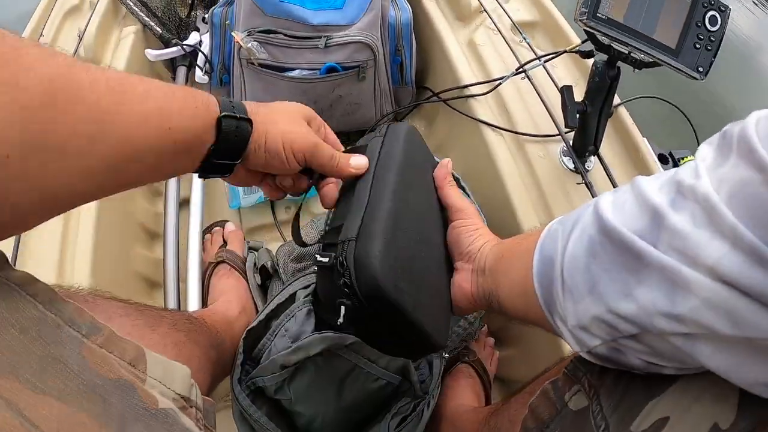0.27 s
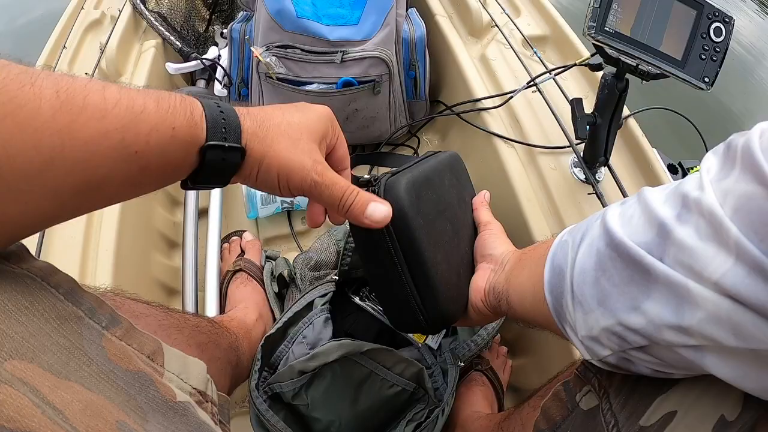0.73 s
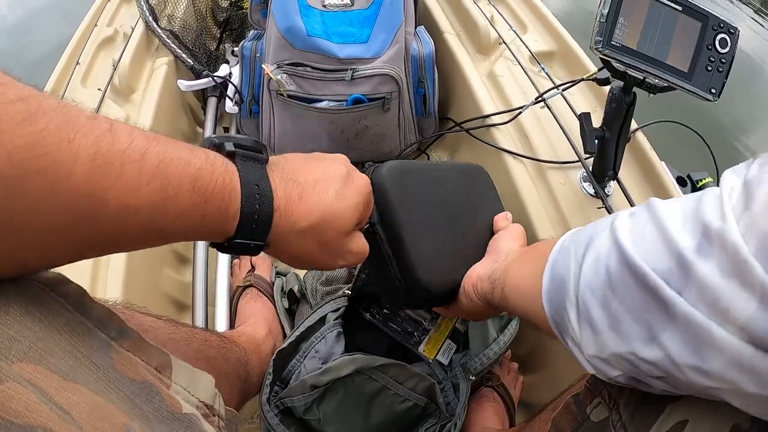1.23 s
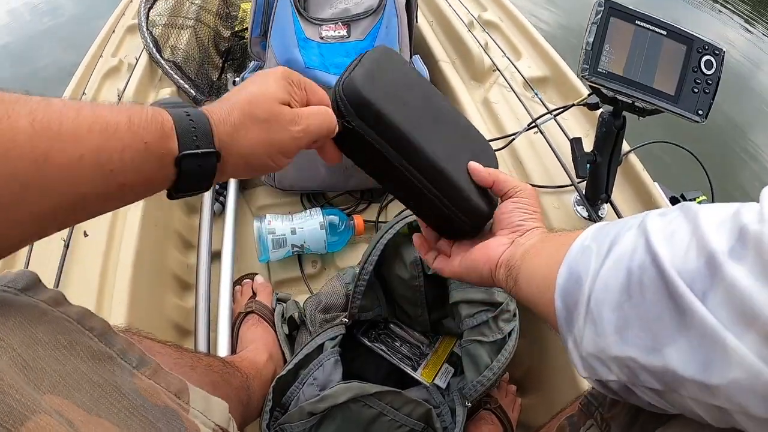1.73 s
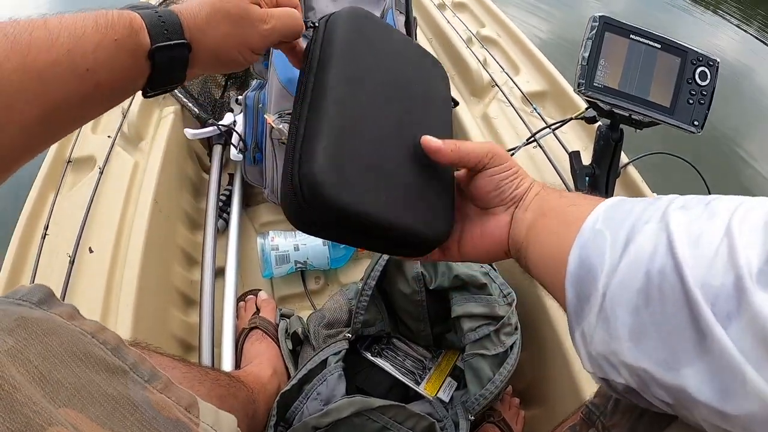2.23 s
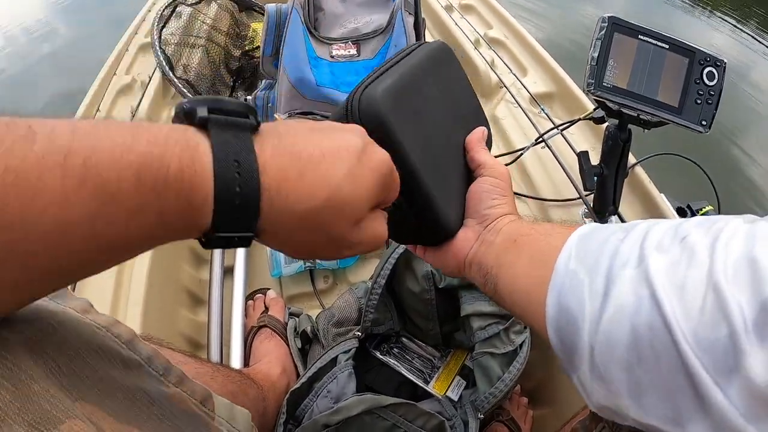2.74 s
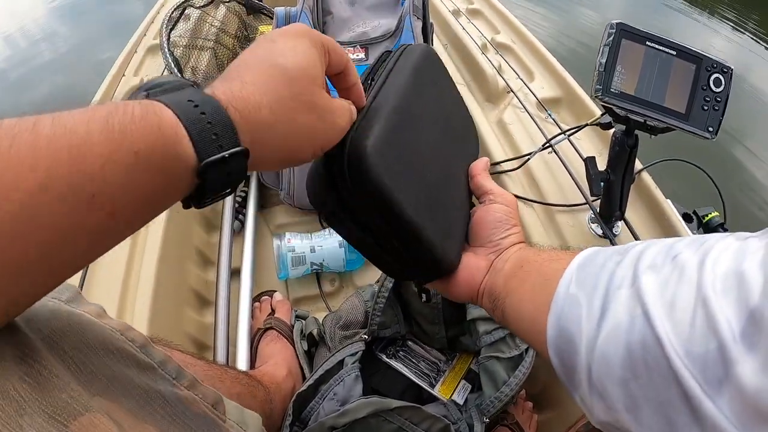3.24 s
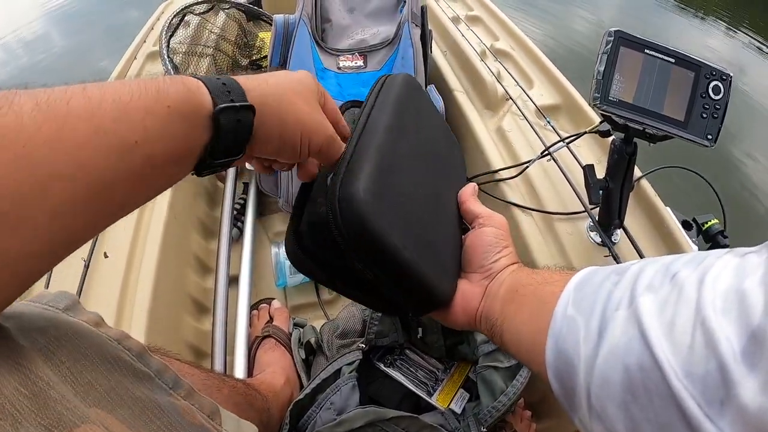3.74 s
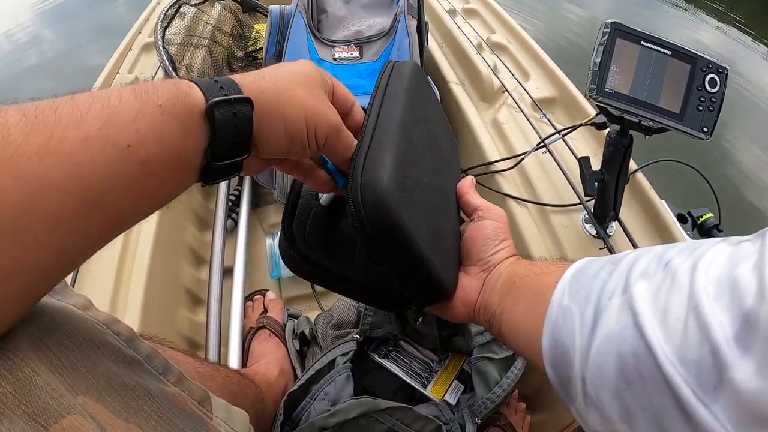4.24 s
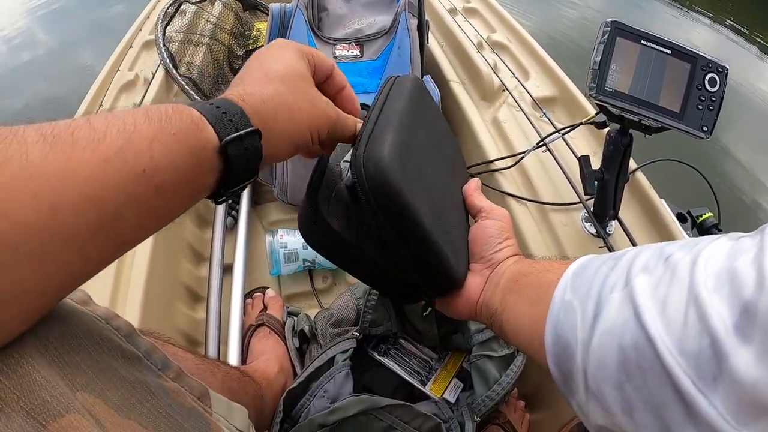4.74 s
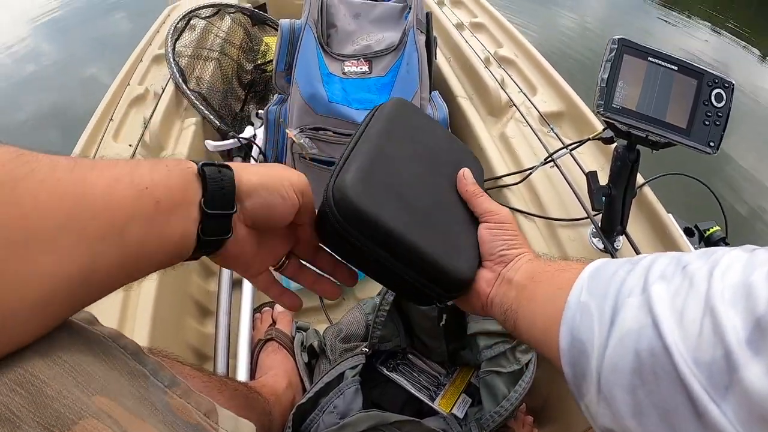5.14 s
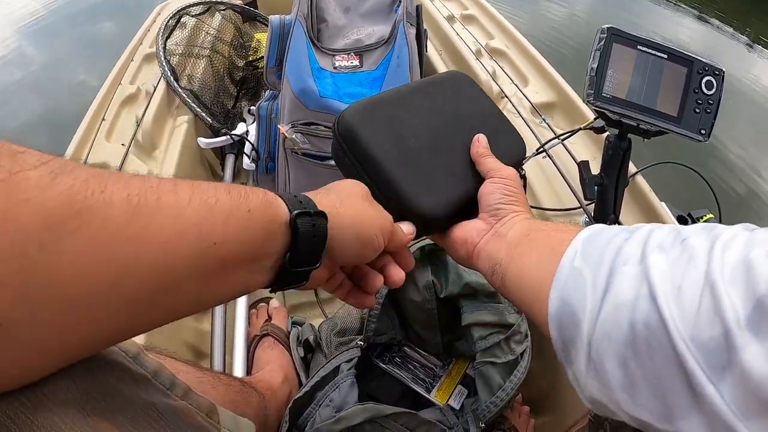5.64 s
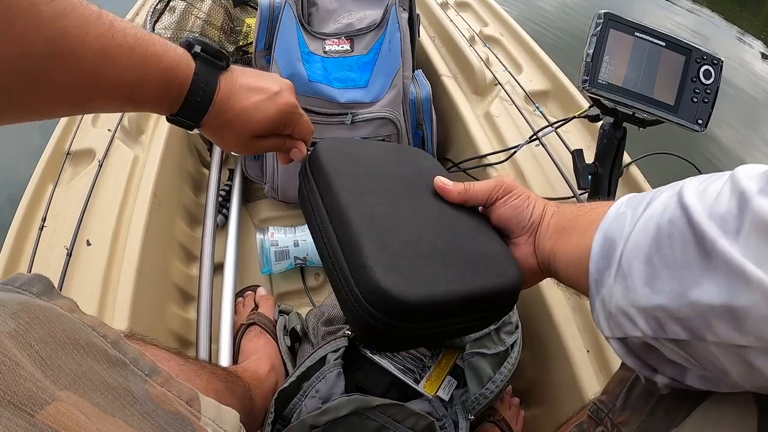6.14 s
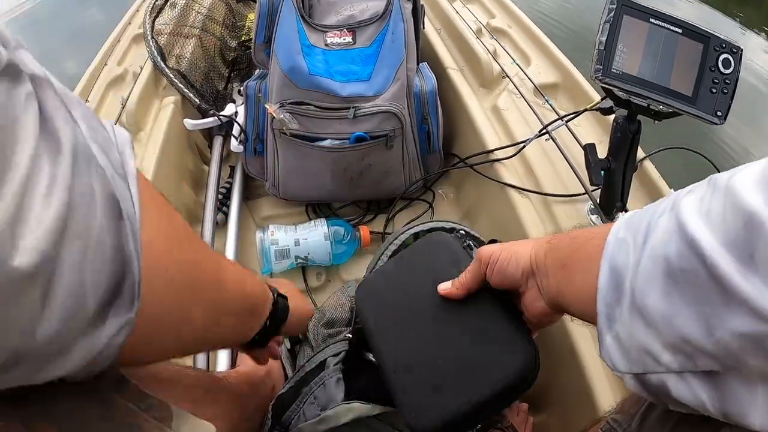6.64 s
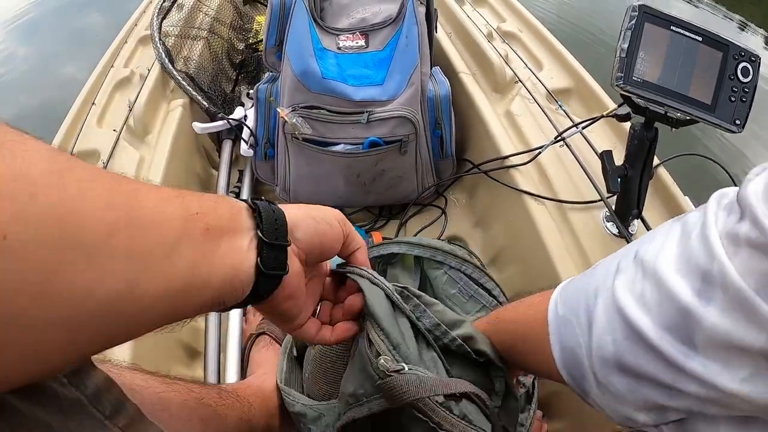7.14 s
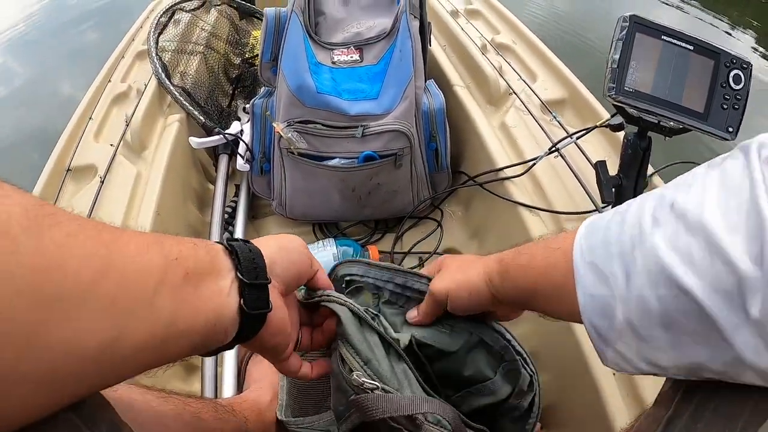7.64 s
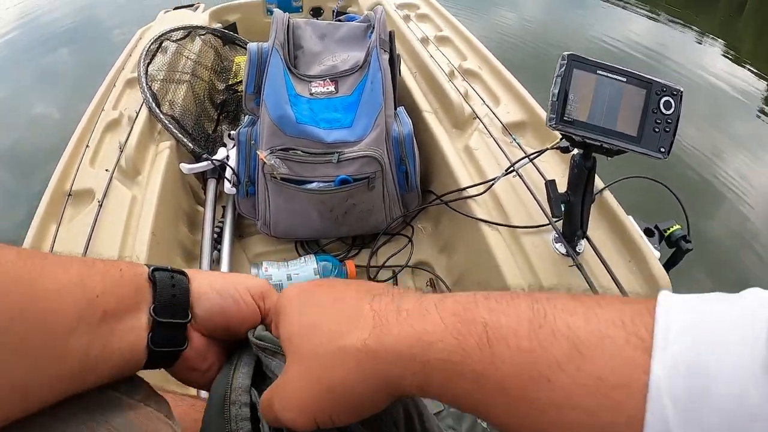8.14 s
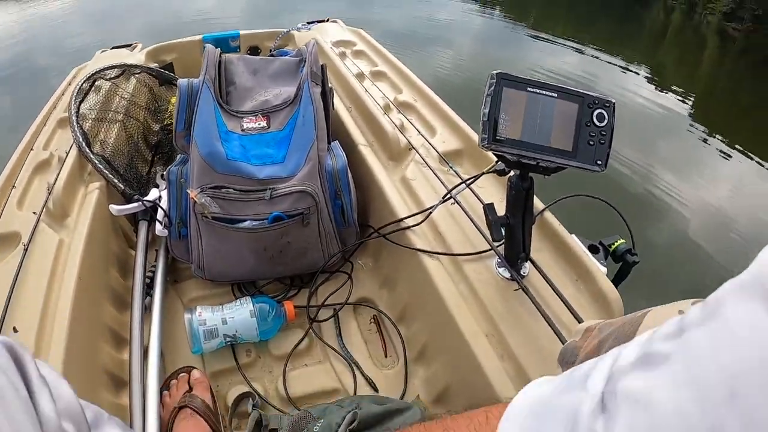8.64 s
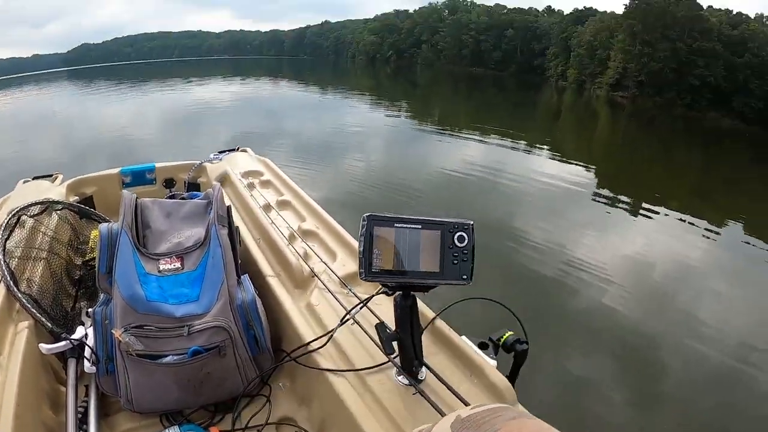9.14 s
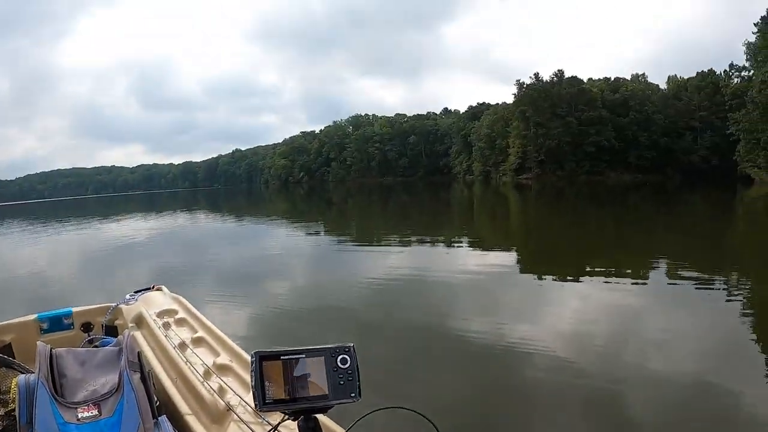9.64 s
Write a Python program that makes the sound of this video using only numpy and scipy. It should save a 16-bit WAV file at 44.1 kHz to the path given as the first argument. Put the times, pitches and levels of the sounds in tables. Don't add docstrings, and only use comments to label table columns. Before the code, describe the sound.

Outdoors on a small boat, close and dry, over a soft low rumble, very faint insects and a distant low propeller drone that fades by 2.5 s. From 0 to 0.6 s cloth rustles and a hollow case knocks lightly. A quick zipper tug rasps at 1.2-1.5 s; boxy knocks follow, then two joined pulls at 2.4-2.9 s, rising in pitch and ending in knocks. From 3 to 5.5 s, fumbling gives hollow knocks, bouncing metal tab ticks and a strong knock at 4.7 s. From 5.7 to 6.5 s the zipper closes in uneven bursts, fastest near 6.1 s, creeping, then running to a stop. Cloth scuffs swell from 6.7 s, with hard knocks at 7.1 and 7.3 s, and heavy hull bumps at 8.1 and 8.3-8.4 s. Rustle dies away; faint drones return and water laps softly at 9.2 s.

```python
import sys
import numpy as np
from scipy import signal
from scipy.fft import rfft, irfft, next_fast_len
from scipy.io import wavfile
from scipy.ndimage import uniform_filter1d

SR = 44100
rng = np.random.default_rng(int(sys.argv[2]) if len(sys.argv) > 2 else 0)


def put_to_file(sound):
    columns = np.atleast_2d(sound).T
    safe = np.clip(columns, -1, 1)
    whole_steps = np.round(safe * 32767)
    wavfile.write(sys.argv[1], SR, whole_steps.astype(np.int16))


def linear_from_db(decibels):
    return 10 ** (np.asarray(decibels, float) / 20)


N = 436149
TIME = np.arange(N) / SR


def rms_one(x):
    return x / np.sqrt(np.mean(x ** 2) + 1e-20)


def in_time(rows):
    s, *columns = np.transpose(rows)
    return [np.interp(TIME, s, column) for column in columns]


def at_hz(points, hz):
    f, value = np.transpose(points)
    return np.interp(np.log(hz + 1), np.log(f + 1), value)


def drift(rate):
    r = np.exp(-80 * np.pi * rate / SR)
    noise = rng.standard_normal(N // 40 + 2002)
    slow = signal.lfilter([1], [1, -2 * r, r * r], noise)[2000:]
    return np.interp(np.arange(N) / 40, np.arange(len(slow)), rms_one(slow))


def resonate(x, modes):
    out = 0
    for k, (hz, width, db) in enumerate(modes):
        r = np.exp(-np.pi * width / SR)
        poles = [1, -2 * r * np.cos(2 * np.pi * hz / SR), r * r]
        ring = signal.lfilter([(1 - r * r) / 2, 0, (r * r - 1) / 2], poles, x + 1e-18)
        out = out + (-1) ** k * linear_from_db(db) * ring
    return out


def twice(x, hz, width):
    band = [(hz, width, 0)]
    return resonate(resonate(x, band), band)


def filtered(x, order, hz, kind):
    return signal.sosfilt(signal.butter(order, hz, kind, fs=SR, output="sos"), x)


def banded(source, spectrum, patchy_db, flicker):
    out, together = 0, drift(flicker / 2)
    edges = 20 * 2 ** np.arange(0, 9.7, .46)
    for k, (low, high) in enumerate(zip(edges, edges[1:])):
        level_db = at_hz(spectrum, np.sqrt(low * high))
        if level_db > -60:
            band = filtered(source[k % 2], 2, [low, high], "band")
            patchy = patchy_db * (0.29 * together + drift(flicker))
            out = out + linear_from_db(level_db + patchy) * band
    return rms_one(out)


def add(track, s, sound):
    i = round(s * SR)
    track[i:i + len(sound)] += sound[:N - i]


def evened(x):
    return x / np.sqrt(uniform_filter1d(x ** 2, size=1800) + 1e-12)


# [t/s, level/dB]
RUMBLE_LEVEL = [(0, -33.5), (.45, -40), (1.4, -37), (2.1, -39.5), (3.2, -36.5), (5.75, -34.5), (6.5, -36.5),
                (8.45, -32.5), (9.89, -33)]
# [f/Hz, level/dB per Hz]
AIR_COLOUR = [(12, -35), (20, -7), (85, 2.5), (174, -3.5), (211, -5.5), (304, -9.5), (332, -18), (459, -8),
              (534, -22), (978, -18), (1440, -28.5), (3500, -60.5), (4550, -79), (7700, -120)]


def open_air():
    noise = rng.standard_normal((2, N))
    level_db = in_time(RUMBLE_LEVEL)[0] + .6
    return linear_from_db(level_db) * banded(noise, AIR_COLOUR, patchy_db=.3, flicker=8)


# [t/s, insects level/dB, road level/dB]
SHORE = [(0, -87.5, -60), (2.2, -100, -63.5), (2.9, -78, -54), (5.5, -76, -45.5), (6.6, -76.5, -53),
         (9.89, -85.5, -62.5)]


def shore():
    out = 0
    for db, (hz, width) in zip(in_time(SHORE), ((6910, 1700), (752.4, 441))):
        band = rms_one(twice(rng.standard_normal(N), hz, width))
        out = out + linear_from_db(db - 1.0 + 4.14 * drift(8.4)) * band
    return out


# [t/s, f/Hz, level/dB]
PROPELLERS = [
    [(0, 148.3, -39), (.65, 148.2, -42), (2.3, 142.2, -40.5), (2.48, 144.9, -40), (2.55, 141, -72.5)],
    [(8.6, 260, -58.5), (8.7, 264.6, -41.5), (9.42, 264, -44.5), (9.6, 275.8, -54.5)],
    [(9.4, 215.2, -64.5), (9.55, 210.7, -40), (9.89, 211.2, -43)],
]


def drones():
    out = 0
    for rows in PROPELLERS:
        hz, db = in_time(rows)
        heard = (TIME >= rows[0][0]) & (TIME < rows[-1][0])
        level = linear_from_db(db + 3 + 1.5 * drift(4))
        out = out + heard * level * np.sin(2 * np.pi * np.cumsum(hz + .8 * drift(4)) / SR)
    return out


# [peak t/s, level/dB, time to swell by 10 dB/s]
HAND_STROKES = [(0.0, -48.5, 0.0831), (.1, -47, 0.0843), (.24, -51.5, 0.1137), (.37, -61, 0.1039),
                (.6, -62.5, 0.09), (1.5, -60, 0.39), (2.35, -64.5, 1.3), (3.7, -64, 0.54), (4.8, -56, 0.01),
                (5.55, -66, 0.3), (6.79, -52, 0.03), (6.892, -47, .05), (7.042, -43.5, 0.0268),
                (7.148, -37, 0.0815), (7.335, -38, 0.0483), (7.42, -58, 0.06), (7.641, -46.5, 0.0381),
                (7.769, -44.5, 0.143), (7.95, -46, 0.2), (8.05, -59, 0.02), (8.24, -55, 0.17),
                (8.38, -43, 0.07), (8.62, -48, 0.1624), (8.84, -54.5, 0.2872), (9.1, -67.5, 0.79)]
FADE_SHARE = 1.072
STILL_DB = -74
SQUARENESS = 1.143


def handling():
    t = np.arange(0, N, 40) / SR
    power = linear_from_db(2 * STILL_DB)
    for s, db, swell in HAND_STROKES:
        away = np.maximum(s - t, (t - s) / FADE_SHARE) / swell
        power = power + linear_from_db(2 * db - 20 * away ** SQUARENESS)
    return np.interp(TIME, t, 10 * np.log10(power))


# [f/Hz, level/dB per Hz]
CLOTH_COLOUR = [(1060, -87.5), (1800, -1.5), (2680, 2), (3630, 5.5), (7020, -7), (7820, -3.5), (9190, -9.5),
                (14200, -30.5), (15500, -46)]
# [f/Hz, level/dB per Hz]
DRAG_COLOUR = [(180, -27.5), (300, 3), (415, 2), (487, 2.5), (1140, -1.5), (2200, -20.5), (2860, -20),
               (4840, -120)]


def rustle():
    cloth_db = handling()
    drag_db = -36.5 + 1.024 * (cloth_db + 47.0)
    sizes = linear_from_db(3.2 * np.minimum(rng.exponential(1, (2, N)), 5)) * rng.choice([-1, 1], (2, N))
    draw, hiss = rng.random((2, N)), rng.standard_normal((2, N))
    fine = sizes * (draw < 2600 * linear_from_db(3.5 * drift(40)) / SR) + .25 * hiss
    coarse = sizes * (draw > 1 - 220 * linear_from_db(7 * drift(25)) / SR) + .12 * hiss
    cloth = linear_from_db(cloth_db) * banded(fine, CLOTH_COLOUR, patchy_db=2.2, flicker=15)
    drag = linear_from_db(drag_db) * banded(coarse, DRAG_COLOUR, patchy_db=2.5, flicker=42.4)
    return cloth + drag


# [t/s, peak level/dB, f/Hz]
KNOCKS_IN_BAG = [(0.009, -26, 528), (0.086, -28.5, 609), (0.176, -30, 446), (0.219, -32.5, 543),
                 (0.312, -29.5, 481), (6.659, -32.5, 493.5), (6.874, -32, 317), (7.127, -12, 695),
                 (7.3, -16, 651), (7.545, -36.5, 400), (7.586, -28, 358.6), (7.866, -31, 330.5),
                 (8.106, -19, 538), (8.315, -10.5, 367.6)]
# [t/s, peak level/dB, f/Hz]
SHELL_KNOCKS = [(1.629, -25.5, 430), (1.666, -20, 371.8), (1.797, -26.5, 422.7), (2.051, -17.5, 385),
                (2.308, -17, 357), (2.477, -22, 371.2), (2.564, -7, 399.8), (2.59, -8.5, 407.4),
                (2.845, -12.5, 397.4), (3.183, -23, 373.3), (3.359, -24.5, 435.7), (3.474, -11.5, 382.8),
                (3.684, -10, 526), (3.919, -6.5, 715.6), (3.922, -15.5, 416.7), (4.234, -23.5, 457.4),
                (4.418, -20.5, 417), (4.458, -26, 360.2), (4.728, -1.5, 489.3), (4.863, -12.5, 415),
                (5.122, -23, 485), (5.404, -21.5, 467), (6.029, -18, 478), (6.095, -12.5, 464.4),
                (6.174, -9.5, 355.2), (6.426, -18.5, 360.4), (6.486, -30, 424.5)]
RING_CYCLES = 23.56
HARD_SHORTENS = 0.276


def knocks(rows, crack_db, top_hz, rise_s):
    out, t = np.zeros(N), np.arange(6000) / SR
    crackle = filtered(rng.standard_normal((len(rows), len(t))), 2, [700, top_hz], "band")
    rise = (1 - np.exp(-t / rise_s)) ** 2
    for (s, db, hz), noise in zip(rows, crackle):
        t60 = RING_CYCLES / hz * linear_from_db(-HARD_SHORTENS * (db + 23))
        turn = 2 * np.pi * hz * t
        boom = np.sin(turn) + .5 * np.sin(1.23 * turn) + 0.1173 * np.sin(2.9 * turn)
        crack = linear_from_db(crack_db + 4 - 60 * t / 0.033) * noise
        add(out, s, linear_from_db(db) * rise * (linear_from_db(-60 * t / t60) * boom + crack))
    return out


# [t/s, peak level/dB, centre f/Hz, gap/s, number of touches]
TAB_RATTLES = [(3.6847, -34.5, 4170, 0.02015, 2), (3.7964, -33.5, 4270, 0.014, 3),
               (3.8742, -36, 5140, 0.015, 2), (3.9444, -35.5, 4790, 0.0187, 2),
               (3.9973, -40, 3360, 0.0186, 3), (4.137, -35, 5940, 0.0143, 4), (4.209, -41, 5290, .019, 2),
               (4.2473, -43, 4570, 0.0252, 2), (4.3036, -45, 4170, .021, 3),
               (4.3596, -45.5, 4960, 0.0272, 3), (4.644, -35.5, 3440, .0245, 3),
               (4.745, -51.5, 3630, 0.027, 5), (5.3973, -27.5, 2410, 0.01733, 2),
               (5.508, -32.5, 3090, 0.0137, 4)]
BOUNCE_LOSS_DB, BOUNCE_SCATTER_DB, BOUNCE_DETUNE = 1, 2, 0.084
BOUNCE_RING = 1.53


def bounces():
    out = []
    for s, db, hz, gap, touches in TAB_RATTLES:
        for k in range(min(round(touches), 8)):
            luck, detune = rng.standard_normal(2)
            touch_db = db - k * BOUNCE_LOSS_DB + BOUNCE_SCATTER_DB * luck
            out.append((s + k * gap, touch_db, hz * np.exp(BOUNCE_DETUNE * detune), BOUNCE_RING * gap))
    return out


# [t/s, peak level/dB, centre f/Hz]
LONE_TICKS = [(1.0643, -49, 3900), (1.148, -36.5, 3640), (1.489, -45, 3390), (1.6287, -38.5, 3740),
              (2.2152, -46.5, 3511), (2.297, -44, 2960), (2.388, -44.5, 2730), (2.4163, -38.5, 5916),
              (3.0636, -36, 2590), (3.617, -37.5, 2730), (3.6648, -23, 5180), (3.9131, -31, 3530),
              (3.924, -22, 3790), (4.4438, -37.5, 4500), (4.497, -43.5, 4000), (4.7156, -37, 4360),
              (4.727, -23.5, 3236), (4.8666, -35, 3000), (5.0774, -46.5, 3270), (5.125, -43, 3154),
              (5.4828, -38.5, 2905), (5.585, -35, 2759), (5.965, -33, 2676), (6.429, -29, 4030),
              (6.4576, -42.5, 3723), (7.5867, -52, 3092), (7.634, -42, 3880)]
# [f/Hz, width f/Hz, level/dB]
TAB_RING = [(6754, 170, -1.5), (8850, 2300, -12.5), (1250, 72.6, 4)]
TICK_T60_S = 0.0201


def ticks():
    out, t = np.zeros(N), np.arange(1800) / SR
    touches = [tuple(row) + (TICK_T60_S,) for row in LONE_TICKS] + bounces()
    noises = filtered(rng.standard_normal((len(touches), len(t))), 2, 8800, "low")
    for (s, db, hz, t60), noise in zip(touches, noises):
        rattle = noise * linear_from_db(-60 * t / t60) * (1 - np.exp(-t / 0.0006))
        own = resonate(rattle, [(hz, 650, 0), (2800, 3000, -6.5)])
        tick = own + resonate(rattle, TAB_RING)
        add(out, s, linear_from_db(db + 0.5) * tick / np.abs(tick).max())
    return out


# [t/s, teeth f/Hz, pull force level/dB]
OPENING_PULLS = [
    [(1.22, 250, -68), (1.29, 519.5, -48.5), (1.32, 455.6, -49.5), (1.367, 649.7, -39.5),
     (1.39, 532.7, -51), (1.42, 394.6, -51), (1.47, 187.8, -71)],
    [(2.41, 145, -49.5), (2.46, 170.1, -49), (2.5, 130.1, -50), (2.556, 385.4, -44), (2.6, 406.5, -37.5),
     (2.64, 360, -42), (2.67, 393.6, -46.5), (2.72, 151.1, -49)],
    [(2.725, 157, -49), (2.75, 323, -41.5), (2.78, 407.6, -42), (2.815, 478.6, -35), (2.85, 445, -50.5),
     (2.88, 227.5, -57.5)],
]
# [t/s, teeth f/Hz, pull force level/dB]
CLOSING_PULLS = [
    [(5.73, 229.7, -60), (5.785, 259.8, -51.5), (5.82, 369.2, -50), (5.862, 640.8, -33),
     (5.877, 481.4, -35.5), (5.91, 439.3, -43.5), (5.95, 270.1, -49.5), (5.99, 281, -44)],
    [(5.995, 279.3, -46), (6.015, 355.5, -46), (6.035, 511, -36), (6.055, 783.5, -34.5),
     (6.075, 1025, -32.5), (6.09, 758.7, -46.5), (6.103, 430.6, -41)],
    [(6.108, 431.5, -54), (6.125, 515.8, -38.5), (6.148, 540, -42.5), (6.17, 281.3, -48.5),
     (6.19, 90.03, -47.5)],
    [(6.195, 75.47, -51), (6.225, 77.8, -50.5), (6.25, 81.37, -53)],
    [(6.255, 100.6, -47), (6.275, 166, -37.5), (6.32, 281.4, -40), (6.352, 491.5, -37.5),
     (6.372, 663.3, -41), (6.397, 830, -34.5), (6.411, 770.9, -44), (6.43, 189.5, -57),
     (6.47, 65.82, -52.5)],
]
# [force reaching the shell level/dB, weight 0-1 of the opposite coil's click, unevenness factor]
PULL_GRIPS = [
    (10, 0.3, 1.3),
    (8, 0.3, 1.9),
    (1, 0.13, 1.2),
    (9.5, .3, 1.3),
    (10, 0.44, .9),
    (9.5, 0.15, 0.89),
    (19, 0.42, 0.64),
    (16.5, 0, .8),
]
# [f/Hz, width f/Hz, level/dB]
SHELL_RINGS = [(384.7, 122, 9.5), (521, 123, 7.5), (703, 332, -1.5), (1191, 106, 1), (1305, 218, -4.5),
               (2484, 233, -4)]
# [f/Hz, width f/Hz, level/dB]
SLIDER_RINGS = [(2520, 960, 6.5), (3996, 1010, 8), (5594, 2000, 6), (7228, 2120, 2), (9080, 440, -1),
                (12500, 3200, -16)]
BOOM_HZ, BOOM_OCTAVES, BOOM_DB = 361, 0.674, 8
SLACK, SLACK_FALL = 0.15, 0.7


def zipper():
    out, pulls = np.zeros(N), OPENING_PULLS + CLOSING_PULLS
    held = [tuple(row) + tuple(grip) for rows, grip in zip(pulls, PULL_GRIPS) for row in rows]
    rate, rasp_db, grip_db, second, uneven = in_time(held)
    near_boom = np.exp(-(np.log2(rate / BOOM_HZ) / BOOM_OCTAVES) ** 2)
    shell_db = rasp_db + grip_db + BOOM_DB * near_boom
    slack = np.clip(uneven * SLACK * (400 / rate) ** SLACK_FALL, 0, .4)
    chance = rng.standard_normal((3, N))
    wobble = rms_one(uniform_filter1d(chance[0], size=90))
    clicks = 2 * np.cumsum(rate * np.exp(.5 * slack * wobble) / SR)
    number = np.floor(clicks).astype(int)
    passed = np.diff(np.floor(clicks), prepend=0)
    opposite = number % 2
    strength = linear_from_db(7.96 * slack * chance[1][number]) * np.where(opposite, np.clip(second, 0, 1), 1)
    push = uniform_filter1d(passed * strength, size=13)
    sharp = strength * np.where(opposite, .4, 1)
    burst = np.exp(-(clicks % 1) / rate / 0.006) * sharp
    scrape = 9 * np.sqrt(rate / 250) * passed * sharp + chance[2] * (burst + .12)
    grind = 0.0168 * chance[2] * (burst + 0.396)
    tilts = [(k, drift(12)) for k in (0, 2, 4)]
    for first, last in [(0, 0), (1, 2), (3, 7)]:
        span = slice(round(pulls[first][0][0] * SR), round(pulls[last][-1][0] * SR))
        boom = resonate((push + grind)[span], SHELL_RINGS)
        padded = filtered(boom, 1, 1800, "low")
        shell = linear_from_db(shell_db[span]) * evened(padded)
        ring = sum(linear_from_db(1.8 * tilt[span]) * resonate(scrape[span], SLIDER_RINGS[k:k + 2]) for k, tilt in tilts)
        rasp = linear_from_db(rasp_db[span]) * evened(ring)
        out[span] = signal.windows.tukey(len(shell), 400 / len(shell)) * (shell + rasp)
    return out


# [t/s, level/dB, f/Hz]
DULL_TAPS = [
    (2.607, -5.5, 1020),
    (8.318, -3, 1345),
    (3.999, -18.5, 1396),
    (4.168, -19.5, 1474),
    (4.688, -11.5, 1250),
    (6.877, -15.5, 1490),
    (8.807, -14, 1570),
]


def taps():
    out, t = np.zeros(N), np.arange(1800) / SR
    noise = filtered(rng.standard_normal(len(t)), 2, 8800, "low")
    for s, db, hz in DULL_TAPS:
        add(out, s, linear_from_db(db) * twice(noise * linear_from_db(-60 * t / 0.057), hz, 500))
    return out


# [t/s, peak level/dB, f/Hz, t60/s, slap below the peak level/dB]
HULL_BUMPS = [
    (5.679, -25, 128.1, 0.12, -29),
    (7.325, -16.5, 58.8, 0.191, -12.5),
    (7.341, -15.5, 195.5, 0.1176, -34),
    (8.102, -8, 156.9, 0.095, -21),
    (8.379, -13.5, 285.5, 0.163, -6.5),
    (8.396, -10.5, 139.1, 0.136, -37),
    (8.408, -9, 191.2, 0.057, -35),
]


def thuds():
    out, t = np.zeros(N), np.arange(12000) / SR
    slaps = filtered(rng.standard_normal((len(HULL_BUMPS), len(t))), 2, [300, 1800], "band")
    rise = 1 - np.exp(-t / .003)
    for (s, db, hz, t60, slap_db), noise in zip(HULL_BUMPS, slaps):
        turns = hz * t * (1 + 0.482 * np.exp(-t / 0.0087))
        overtone = 0.704 * np.sin(2 * np.pi * 2.3 * turns) * linear_from_db(-60 * t / t60)
        boom = np.sin(2 * np.pi * turns) + overtone
        slap = linear_from_db(slap_db + 9 - 60 * t / 0.0705) * noise
        add(out, s, linear_from_db(db) * rise * (linear_from_db(2.5 - 60 * t / t60) * boom + slap))
    return out


# [t/s, half length/s, level/dB, f/Hz, width f/Hz]
WATER_LAP = (9.21, 0.1, -50, 1400, 400)


def lap():
    s, half, db, hz, width = WATER_LAP
    wash = rms_one(twice(rng.standard_normal(N), hz, width))
    return linear_from_db(db) * np.exp(-((TIME - s) / half) ** 2) * wash


def scene():
    background = open_air() + shore() + drones()
    bag_knocks = knocks(KNOCKS_IN_BAG, crack_db=-6, top_hz=2737, rise_s=0.000305)
    shell_knocks = knocks(SHELL_KNOCKS, crack_db=-21, top_hz=3027.9, rise_s=0.00084)
    case = bag_knocks + ticks() + zipper() + shell_knocks + taps()
    mid = background + rustle() + case + thuds() + lap()
    return np.array([mid, mid])


def roll_off(x):
    return signal.sosfilt(signal.butter(12, 15950, fs=SR, output="sos"), x)


# [f/Hz, side minus mid level/dB]
SIDE_LEVEL = [(60, -26), (330, -29), (650, -23), (1200, -11), (2800, -10), (5980, -9), (15000, -1)]
# [f/Hz, left minus right level/dB]
LEFT_LEAN = [(60, -0.2), (380, 0.0), (700, 0.4), (1300, 1.4), (2800, -1.7), (5980, -0.7), (15000, -2.2)]


def record(dry):
    size = next_fast_len(N + 2000)
    hz = np.arange(size // 2 + 1) * SR / size
    heard = rfft(dry[0], size)
    scatter = rfft(rng.standard_normal((2, 400)) * np.exp(-np.arange(400) / 100), size)
    scatter = scatter / np.abs(scatter)
    paths = irfft(heard * linear_from_db(at_hz(SIDE_LEVEL, hz)) * scatter, size)[:, :N]
    turn = 2.02 * drift(4.89)
    side = np.cos(turn) * paths[0] + np.sin(turn) * paths[1]
    lean = linear_from_db(at_hz(LEFT_LEAN, hz) / 2)
    ports = irfft([heard * lean, heard / lean], size)[:, :N] + side * np.array([[1], [-1]])
    treble_cut = signal.cheby2(10, 60, 16300, fs=SR, output="sos")
    return roll_off(signal.sosfilt(treble_cut, ports))


dry = scene()
out = record(dry)
put_to_file(out)
```